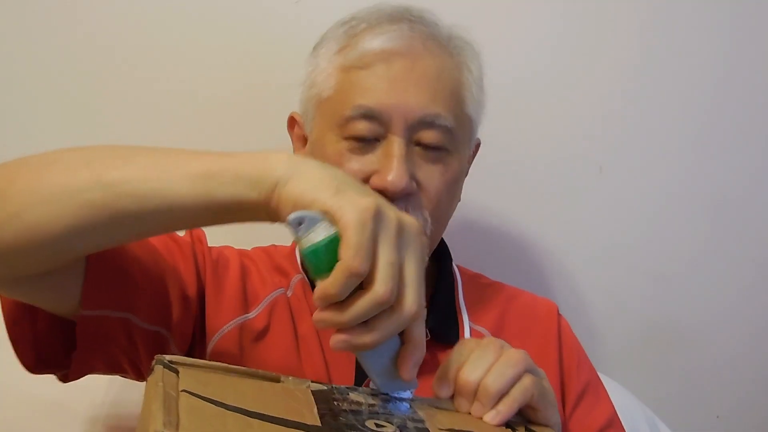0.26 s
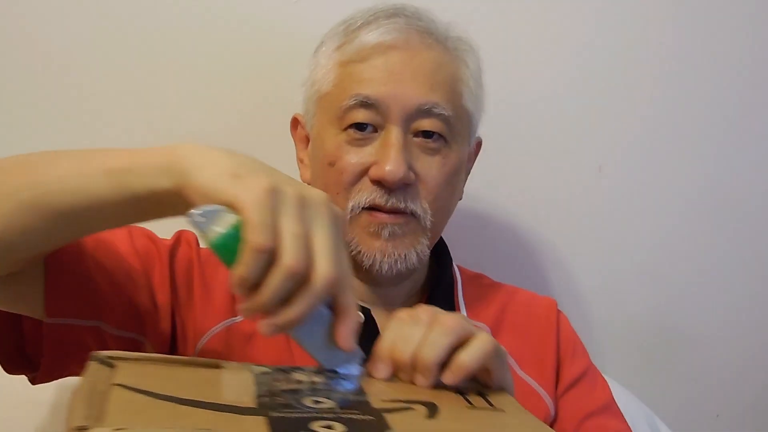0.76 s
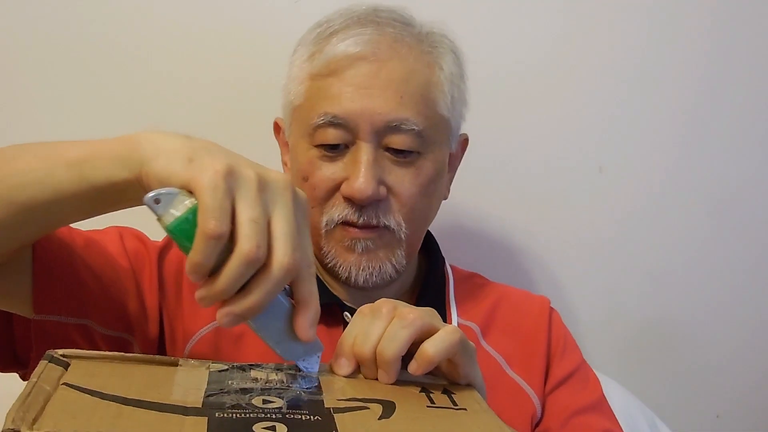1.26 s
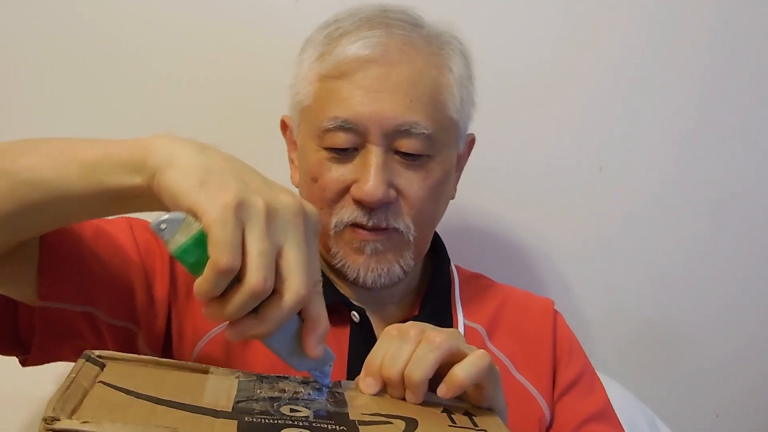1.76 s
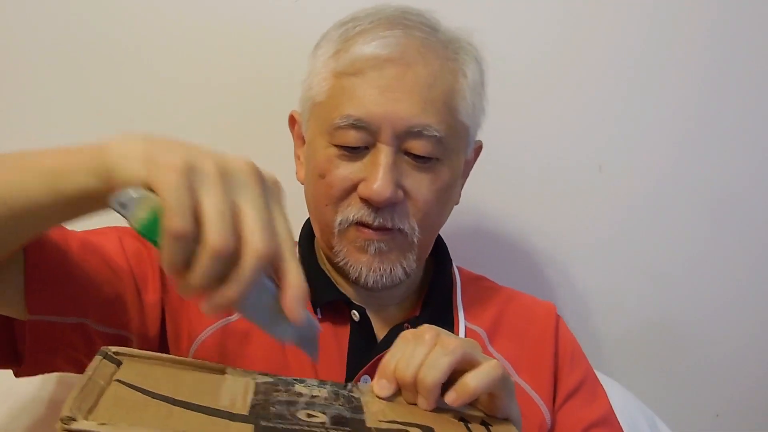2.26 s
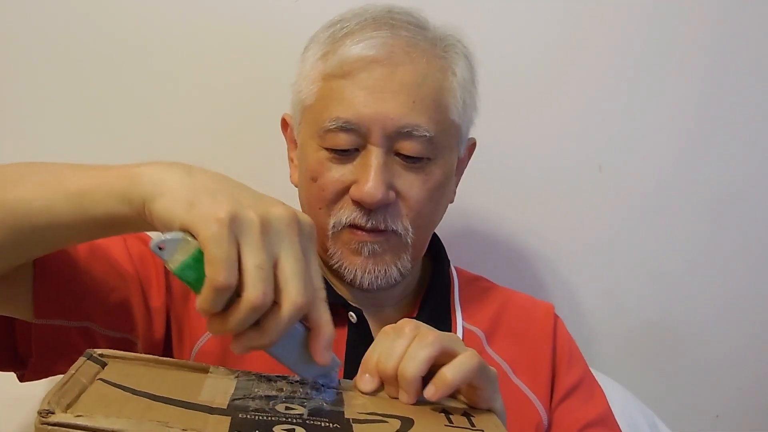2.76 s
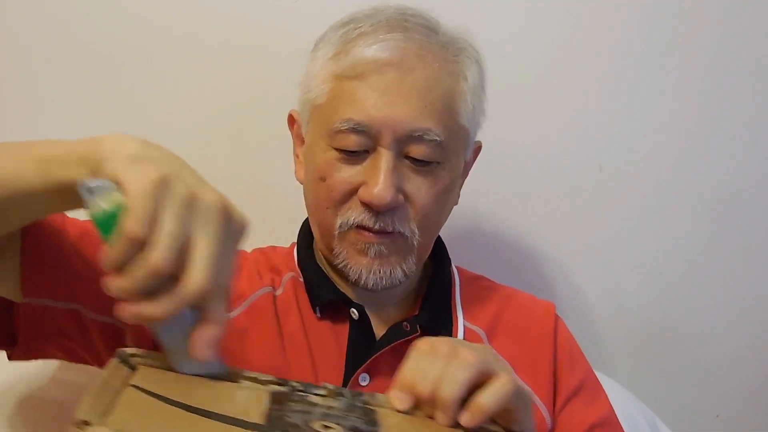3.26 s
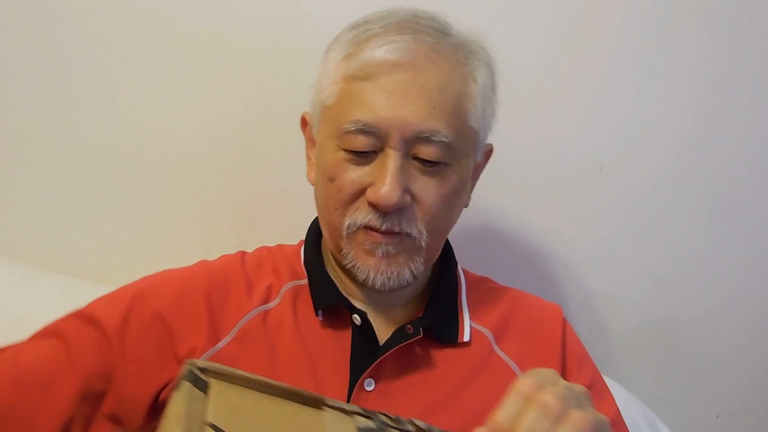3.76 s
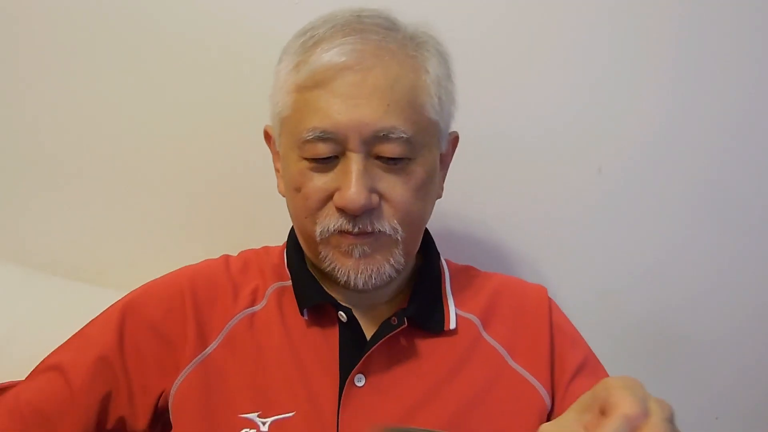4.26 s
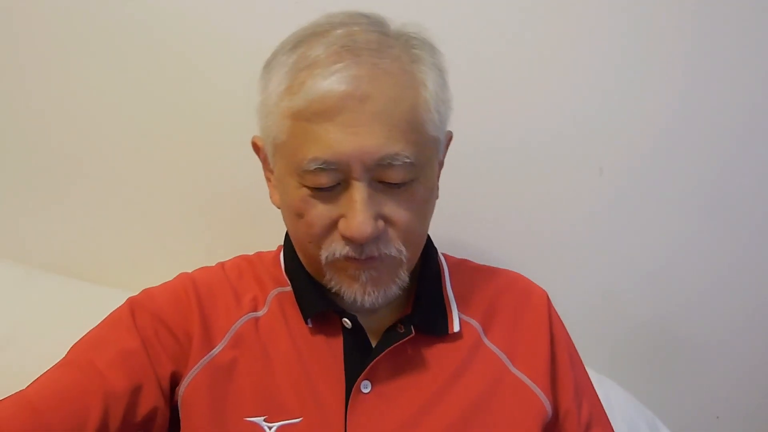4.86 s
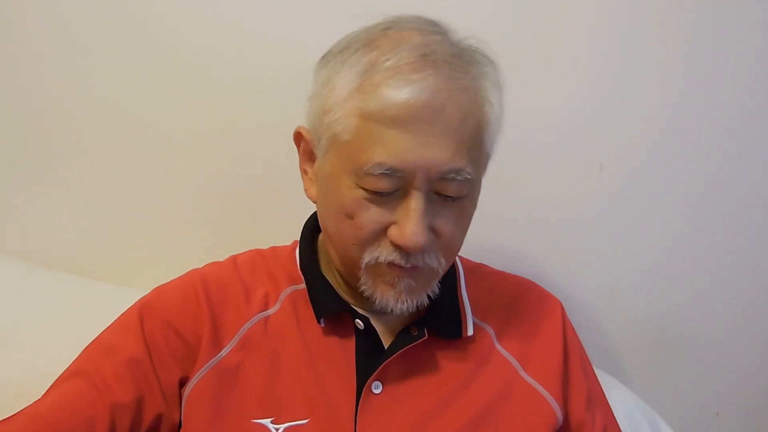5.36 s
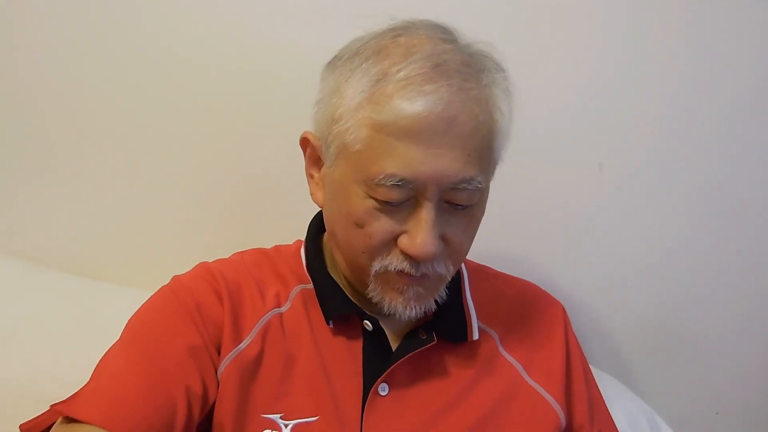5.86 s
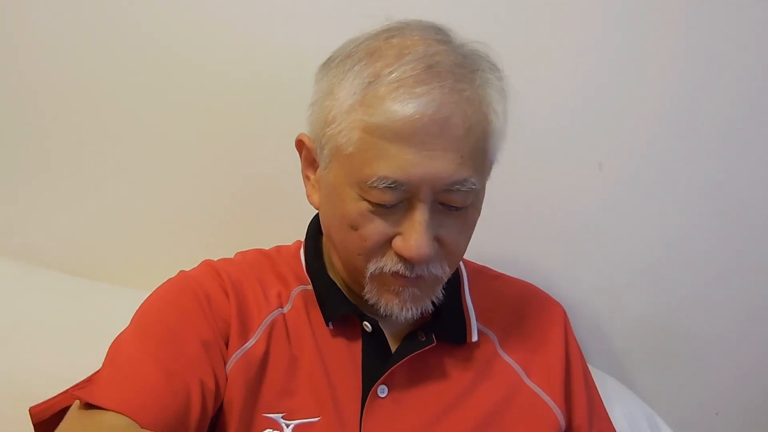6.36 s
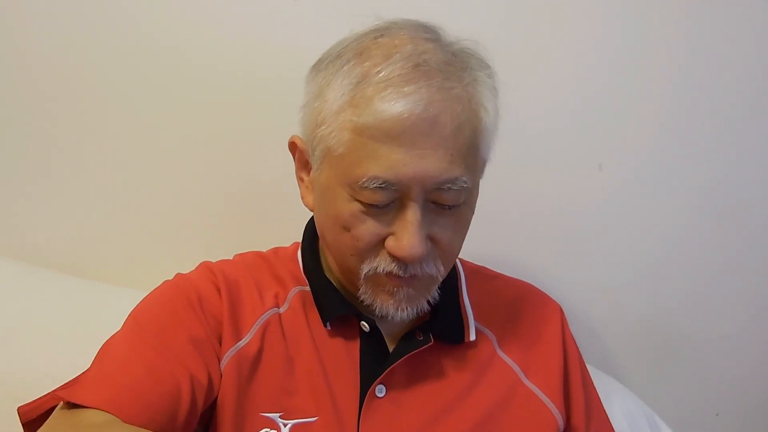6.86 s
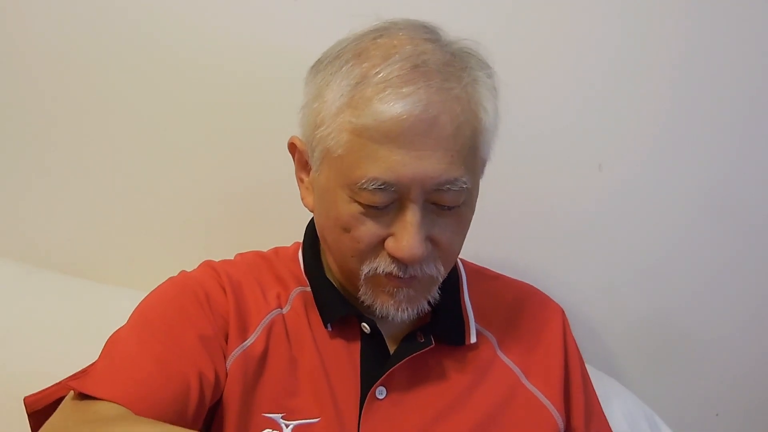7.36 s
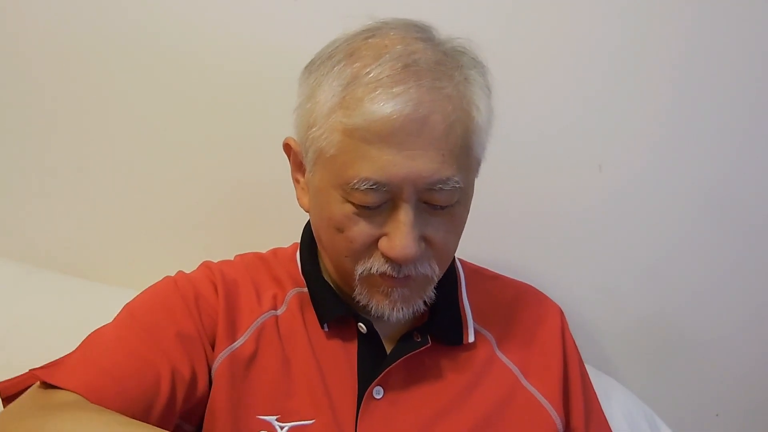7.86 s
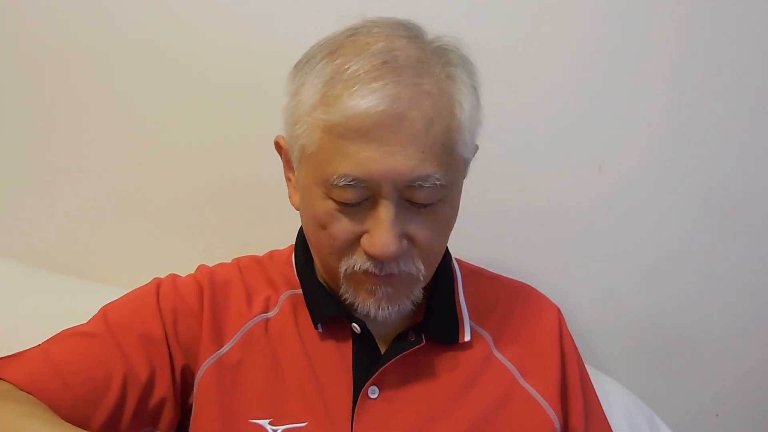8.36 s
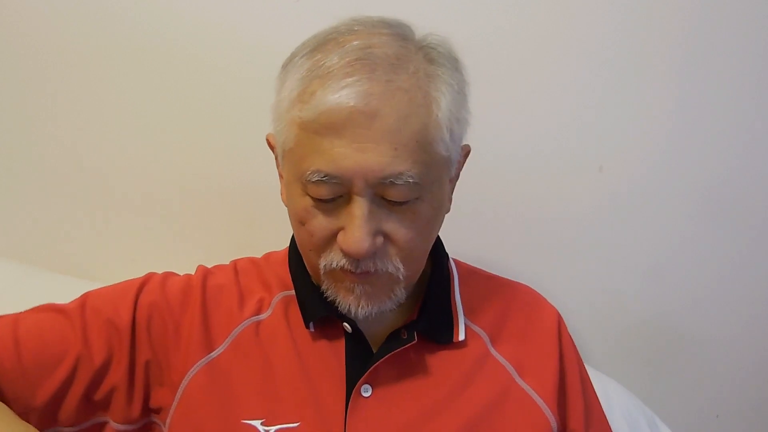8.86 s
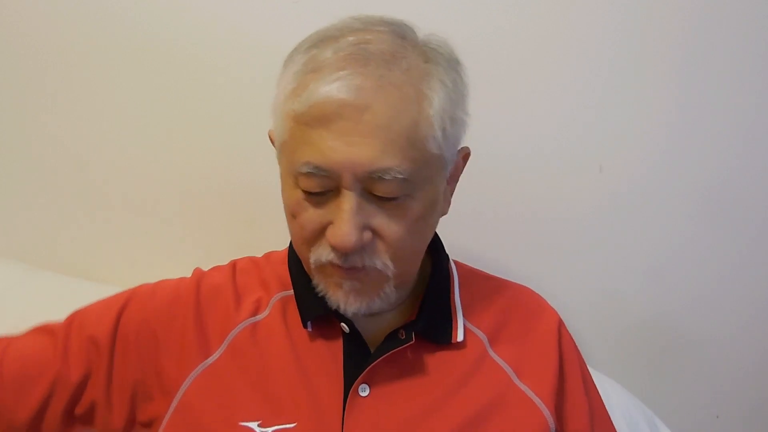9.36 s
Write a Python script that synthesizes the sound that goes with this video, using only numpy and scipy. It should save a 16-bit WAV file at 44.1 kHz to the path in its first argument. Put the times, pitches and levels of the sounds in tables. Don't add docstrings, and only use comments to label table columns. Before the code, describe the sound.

A box cutter works very near the microphone, indoors, with little echo. Thin ticks and gritty rubbing are broken by sudden bright tape cracks and short cardboard tears. Midway the cutting pauses for a soft cloth-like slide and small creaks. Isolated snaps resume, building into a vigorous ragged rip with popping flutes and boxy thumps, then faint rustles over low hiss.

```python
import sys
import numpy as np
from scipy import signal
from scipy.fft import rfft, irfft, next_fast_len
from scipy.io import wavfile
from scipy.ndimage import uniform_filter1d, minimum_filter1d, map_coordinates

SR = 44100
rng = np.random.default_rng(int(sys.argv[2]) if len(sys.argv) > 2 else 0)


def invert_db(x):
    u = np.asarray(x, float) / 20
    return 10 ** u


def dump_mix(stems):
    frames = np.atleast_2d(stems).T
    limited = np.clip(frames, -1, 1)
    pcm = np.round(limited * 32767).astype(np.int16)
    wavfile.write(sys.argv[1], SR, pcm)


N = 423360

# start in seconds, peak in dB, low mode in dB.
GUARD = [
    (1.1424, -19, -20),
    (2.5228, -27, -17),
    (2.6, -32.5, -15),
    (2.6424, -36, -7),
    (2.6535, -26, -7.5),
    (2.6375, -40, 2),
    (3.6688, -31, -12),
    (3.997, -35, -8),
    (6.029, -32, -13.5),
]
# frequency in Hz, t60 in seconds.
PLASTIC = [(2100, .026), (3480, .011)]
# frequency in Hz, width in Hz, level in dB.
BOX = [(270, 103, 0.5), (843, 570, 2)]
# frequency in Hz, width in Hz, level in dB.
EDGE = [(1200, 1920, -0.5), (2800, 4180, 1.5)]
# frequency in Hz, width in Hz, level in dB.
TAPE = [(3530, 1680, 7), (6230, 3700, 5.5)]
# frequency in Hz, width in Hz, level in dB.
FIZZ = [(6610, 5660, -5.5), (11070, 2800, 4), (13120, 3640, -4)]
# frequency in Hz, width in Hz, level in dB.
THUMP = [(42, 42, -13), (190.6, 135, 0)]
# frequency in Hz, density in dB per Hz.
HUSH = [(140, -6), (280, 4), (850, 5), (1220, 7.5), (1550, 3), (4000, 1.5), (10000, -7), (16000, -10.5)]
# frequency in Hz, correlation from -1 to 1.
ALIKE = [(60, .965), (250, .996), (700, .965), (1400, .88), (3100, .62), (8000, .25), (15000, -.15)]
# frequency in Hz, t60 in seconds.
ROOM = [(200, 0.09), (2000, 0.15), (12000, 0.18)]
# start in seconds, peak in dB, frequency in Hz.
KNOCKS = [
    (3.238, -27.5, 270),
    (3.242, -36, 226),
    (7.99, -35, 284),
    (8.0705, -16.5, 814),
    (8.19, -26, 279.5),
    (8.46, -32, 270),
]
# peak in seconds, strength in dB, answer of the card below in dB, halving time in ms.
TAPE_SNAPS = [(.208, -39.5, 2, 1.8), (.3426, -29, -14, 1.1), (.38, -49, 1.5, 2.1), (.9593, -59, 11.5, 2.1),
              (1.1385, -39, -0.5, 2.5), (1.1425, -25.5, -6, 2.4), (1.151, -50, -13, 2.7),
              (1.304, -39, -3, 0.88), (2.0962, -49.5, 11, 1.13), (2.1661, -38.5, -25, 3.5),
              (2.5243, -29, -26, 4.3), (2.531, -24, -8.5, 1.35), (2.6024, -55.5, 4, 3),
              (2.6526, -32, -3.5, 2.7), (3.3723, -23, -24, 1.5), (3.379, -20.5, -8.5, 1.4),
              (3.6699, -42, -7, 10), (3.8393, -49, 0, 2), (4.904, -33, -22, 2.3), (5.4668, -23, -21, 2.4),
              (5.475, -32, -23, 6.9), (6.0302, -39, -7, 1.9), (6.06, -29.5, -22, 2.6),
              (6.4465, -34, -0.5, 0.97), (6.4544, -30, 3, 1.6), (6.7586, -46, -3.5, 6.6),
              (6.7753, -32.5, -5, 4.5), (6.9638, -28.5, -7.5, 4.2), (6.9674, -18, -31, 1.4),
              (7.4476, -37.5, 3, 5.3), (8.404, -35.5, -0.5, 7.5), (8.839, -28.5, 0.5, 7.9)]
# peak in seconds, strength in dB, answer of the card in dB, halving time in ms.
FIBRES = [(.0353, -47, 17.5, 1.8), (.4116, -39.5, -3, 2.8), (.6404, -44, -12, 1.7),
          (.7607, -31.5, -5, 0.93), (1.373, -42, -24, 1.2), (2.2684, -26, -10, 0.76),
          (3.0845, -28.5, -9, 1.3), (3.126, -38, -20, 1), (3.1715, -28, 2, 9.4), (3.6316, -36, -22, 0.83),
          (4.0268, -43.5, -15, 23), (4.168, -37.5, -1, 9.5), (6.3033, -43, -13, 3.5),
          (6.3163, -30, -12, 1.1), (6.7912, -20.5, -2.5, 2.15), (7.6295, -32.5, 0.5, 3),
          (7.7, -24.5, 12, 4.9), (7.782, -22, -15, 1.4), (7.862, -55, -20, 1), (7.937, -30.5, 6.5, 16),
          (7.9913, -24.5, 6.5, 6.1), (8.0715, -22.5, 5.5, 10.8), (8.154, -15, 3.5, 1.6),
          (8.4239, -20.5, -7, 3.4), (8.4477, -18, -14, 1.6), (8.7018, -20, -18, .8), (8.706, -21, -28, 5.6),
          (8.778, -18.5, -24, .55), (8.804, -28.5, 5.5, 56), (8.8522, -17, 7, 9.1), (8.9252, -37, -10, 1.4),
          (8.9668, -45, -20, 1), (9.06, -26, 11.5, 9.2), (9.09, -20.5, 10.5, 4.3)]
# peak in seconds, strength in dB, depth of the cut in dB, halving time in ms.
JERKS = [(.1273, -51.5, 12, 2.4), (.217, -23.5, -12.5, 3.4), (.2255, -33, 0, 1.7), (.651, -49, 1, 5),
         (1.9175, -27, 1.5, 7.7), (1.9338, -14, -10, 2.6), (1.9405, -19, 0.5, 7.4), (1.9533, -21.5, 4.5, 6),
         (1.9655, -20, 5, 1.6), (1.974, -41, 15.5, 14), (1.9831, -23.5, 0.5, 3), (2.6425, -37.5, 6, 1.5),
         (3.0, -17.5, -1, 11.3), (3.1911, -19, -4, 11.4), (3.2321, -21.5, -1, 7.3),
         (3.3959, -21, -8.5, 5.3), (4.0046, -43, 5, 3.7), (4.0443, -49.5, 4.5, 4.7),
         (4.0854, -44.5, -3, 4.9), (4.2174, -41.5, -23, 31), (6.4835, -27.5, -5.5, 3.2),
         (6.4942, -34.5, -3.5, 16), (6.5153, -31, 2, 7), (7.2353, -42, 2.5, 3.5), (7.261, -36.5, 1, 1.66),
         (7.4052, -32.5, -3.5, 17), (7.4212, -19.5, -4, 3.4), (7.4303, -34, 2, 11.5),
         (7.5952, -32.5, -5, 0.93), (8.787, -40, -24, 6.1)]
# peak in seconds, strength in dB, depth in dB, halving time in ms.
RIP = [(7.6785, -38, 1, 14), (7.6933, -26.5, 12, 1.3), (7.7145, -29.5, 2.5, 10), (7.7352, -38.5, 3, 8.1),
       (7.7535, -22.5, 1.5, 7), (7.826, -36, -2, 2.7), (7.901, -36, 0.5, 8.3), (7.914, -36, 0.5, 10.5),
       (7.927, -24, -3, 5.1), (7.9545, -22.5, -1.5, 12), (7.9728, -20, -0.5, 3.7), (8.0315, -21, -0.5, 7.7),
       (8.136, -26, -2.5, 41), (8.1905, -15.5, -2, 6.3), (8.238, -33, -10, 7.4), (8.4154, -32, -2, 2.8),
       (8.4313, -32.5, -3.5, 66), (8.4578, -22, 3.5, 7.6), (8.5167, -32.5, 5.5, 9.4), (8.5572, -35.5, 6, 9),
       (8.5755, -32, -2, 5.7), (8.598, -30, -3, 2.2), (8.6105, -29.5, -4, 8.5), (8.6786, -27, -3.5, 5),
       (8.697, -17, -21, 2.2), (8.7247, -23.5, -8, 3.5), (8.735, -31.5, -8.5, 12), (9.0098, -16, 4, 3.26),
       (9.017, -21.5, 1.5, 22), (9.0747, -26, -4.5, 24)]
# peak in seconds, strength in dB, boom in dB, halving time in ms.
BUMPS = [(.7685, -40.5, -2.5, 2.7), (.8421, -66, 2, 3.3), (.9038, -36.5, -5, 2.2), (1.1209, -54, 14.5, 1.9),
         (1.4316, -40, -2, 4.2), (1.4791, -36, 2.5, 1.43), (1.85, -57.5, 13, 4), (4.349, -32, -8, 5.2),
         (4.5147, -36, -23, 1.3), (4.5811, -38.5, -5, 3.8), (4.6996, -39, -3.5, 3.6), (4.7458, -53, 9, 12),
         (4.7935, -43.5, -6, 14), (4.818, -39.5, -6, 14), (4.857, -43, -4, 6.7), (5.013, -47.5, 4.5, 3.7),
         (5.049, -43.5, 0, 12), (5.125, -48.5, 5, 7.1), (5.709, -48, -7, 5.4), (7.275, -46, 4, 3.3),
         (8.0123, -30, -23, 9.4), (8.629, -42, 4, 7.5), (8.998, -29.5, -5, 5.3), (9.247, -45, 0, 4.7),
         (9.4428, -42.5, -38, 4.3), (9.4901, -39, -6, 5)]
# events, dB over strength for box, edge, tape and fizz,
# share of the events' third column for the same four.
KINDS = [
    (TAPE_SNAPS, (-5, 2, 1, -0.5), (1.87, 1.63, 0.29, 0.5)),
    (FIBRES, (-13, -4, -15, 0), (0.82, 0.64, 0, 0)),
    (JERKS, (-5.5, 0.5, -1.5, 2), (1, 0.95, 0.036, 0.13)),
    (RIP, (-5, 1, -5, 0.5), (0.62, 1, 0.21, 0.15)),
    (BUMPS, (-1.5, -2.5, -37, -8.5), (1, 0, 0, 0)),
]
# time of most pressure in seconds, level in dB, brightness
# in dB, doubling time in seconds, halving time in seconds.
STROKES = [(.1, -62.5, -12, 0.66, 0.45), (.36, -49, -3, 0.17, 0.071), (.54, -53, 3.5, 0.029, 0.019),
           (.72, -58.5, -2, 0.081, .11), (1.06, -51, -1.5, 0.23, 0.17), (1.4, -71, -7, 0.21, 0.3),
           (1.63, -50, -0.5, 0.038, 0.037), (1.88, -65, 2, 0.1, .2), (1.913, -37, 2, 0.0046, .02),
           (2.06, -48, -12, 0.11, 0.045), (2.65, -62.5, -12, 0.5, 0.13),
           (2.805, -54.5, 2, 0.035, 0.026), (3.05, -31.5, -3.5, 0.0046, 0.018),
           (3.13, -60, 8, 0.031, .11), (3.3, -37, -8, 0.054, 0.024), (3.39, -42.5, 0.5, 0.095, 0.032),
           (3.72, -55.5, -2.5, 0.31, 0.24),
           (5.04, -45, -1.5, 0.069, 0.021), (5.56, -61.5, 1, .03, 0.13), (6.3, -60.5, 2, 0.069, .11),
                (6.44, -51, 0.5, 0.023, 0.091), (6.738, -49.5, -6, 0.02, 0.047),
                (7.39, -48.5, -19, 0.011, 0.039), (7.87, -53, -1, 0.31, 0.58), (8.33, -64, 3, 0.66, 0.29),
                (8.64, -41.5, -3, 0.18, 0.049), (8.79, -48, -10, 0.13, 0.033), (9.2, -61, -6, 0.012, 0.21),
                (9.4, -52.5, -2, 0.21, 0.052)]
# time in seconds, pressure in dB, brightness in dB.
SLIDE = [
    (3.96, -64, -7),
    (4.1, -47, -3.5),
    (4.18, -43, 3),
    (4.32, -46, 1.5),
    (4.47, -50, -3),
    (4.85, -52, -4),
    (5.35, -50, 0.5),
    (5.45, -47, -3),
    (5.56, -59, -4),
]
# start in seconds, peak in dB, frequency in Hz.
POPS = [(0.2048, -28, 2580), (0.2163, -25.5, 2050), (0.4403, -40, 650), (0.7671, -40, 2360),
        (0.9447, -43, 1340), (1.909, -34, 3190), (1.9637, -7.5, 2780), (1.9655, -17, 1120),
        (2.997, -16, 2640), (3.2333, -24, 2680), (3.2429, -24, 2550), (3.3711, -30, 3170),
        (3.379, -21.5, 2620), (3.3967, -17.5, 2010), (3.7246, -39.5, 2980), (3.9933, -38, 955),
        (3.9952, -40, 3220), (6.4925, -37, 3070), (6.518, -29, 2670), (6.7973, -29.5, 920),
        (6.962, -30, 2660), (7.398, -36, 2800), (7.5945, -38.5, 2550), (7.7073, -20, 795),
        (7.7557, -12.5, 1990), (7.9284, -21.5, 2550), (8.035, -21, 2050), (8.0739, -14, 790),
        (8.1531, -18, 1960), (8.2002, -12, 1050), (8.3693, -43, 1574), (8.4162, -28, 1730),
        (8.447, -26, 2840), (8.4574, -15, 1290), (8.4656, -33, 860), (8.5598, -23, 560), (8.809, -22, 2870),
        (8.8515, -12, 1620), (8.8624, -20, 770), (8.882, -24, 2400), (9.0086, -11.5, 2550),
        (9.018, -10, 2800), (9.0712, -22, 2020)]
# start in seconds, peak in dB, frequency in Hz.
PINGS = [(0.1854, -40, 3250), (0.2164, -15, 10640), (0.217, -16.5, 9100), (0.2166, -16, 5670),
         (0.4263, -36, 11700), (0.7606, -45, 8570), (0.8414, -41, 11970), (1.1417, -25, 6840),
         (1.9394, -20, 8830), (2.5308, -29, 4740), (3.001, -18, 7400), (3.003, -13, 5600),
         (3.231, -18, 9700), (3.371, -24, 3490), (3.3946, -19, 4980), (3.4031, -14, 8900),
         (3.666, -35, 12530), (3.8401, -37, 3500), (5.4674, -21, 6340), (6.4831, -22, 6400),
         (6.514, -19.5, 5620), (6.7569, -33, 5170), (6.784, -35, 8400), (6.7906, -25, 3750),
         (6.7909, -29, 7640), (6.9615, -40, 4010), (6.9615, -28, 7800), (6.967, -29, 8050),
         (7.4192, -13.5, 6700), (7.4193, -15, 4500), (7.4289, -20, 4230), (7.7818, -26, 6900),
         (7.8954, -41, 6070), (7.9285, -17, 7620), (7.9642, -15, 7540), (7.9667, -22, 9350),
         (8.034, -19, 7500), (8.1484, -15, 11800), (8.1536, -17, 4800), (8.6965, -19, 8600),
         (8.6977, -15, 5600), (8.7334, -25, 5730), (8.8617, -25, 8350), (9.0093, -13, 6330),
         (9.4169, -45, 12660)]
# start in seconds, peak in dB, frequency in Hz, t60 in ms.
CREAKS = [(3.005, -18.5, 496, 29), (3.008, -23, 860, 29), (4.346, -33, 1820, 24), (4.347, -36, 895, 16),
          (4.513, -32.5, 1670, 8.7), (4.581, -38, 1290, 12), (4.696, -42, 860, 13), (4.746, -36, 1520, 11),
          (4.792, -36, 1230, 13), (4.814, -34, 1760, 12), (4.856, -36, 1190, 14), (5.046, -44, 860, 14),
          (5.4755, -36, 6100, 12), (8.7047, -17.5, 5600, 8.3), (8.7245, -24, 6140, 10),
          (8.742, -33, 6000, 40), (9.023, -21, 2800, 20), (7.749, -18.5, 2480, 8.7), (1.934, -13, 740, 12),
          (2.532, -43, 2120, 22), (0.65, -40, 785, 7.7), (1.557, -42, 1200, 10), (9.057, -14.5, 1120, 13)]
# peak in seconds, level in dB.
TICKS = [(0.0517, -38), (0.6391, -33), (1.0181, -35), (1.3664, -40), (1.6172, -29.5), (1.7933, -44),
         (1.8061, -39), (1.8632, -47), (2.1914, -45), (2.679, -42), (2.7064, -35), (2.7274, -46),
         (2.908, -45), (2.9454, -47), (3.6101, -36), (3.8127, -40), (3.8888, -37), (3.9722, -45),
         (4.0404, -35), (5.67, -40), (5.7309, -47), (5.881, -41), (6.6423, -34), (7.1253, -45),
         (7.5832, -41), (7.9547, -12), (8.1335, -14), (9.3736, -41), (9.398, -34), (9.5974, -31)]
# peak in seconds, level in dB.
NICKS = [(0.3306, -35), (1.2685, -52), (1.5399, -44), (1.5551, -34), (1.722, -42), (2.1084, -34),
         (2.3306, -46), (2.394, -45), (2.8237, -33), (3.5259, -44), (3.5411, -36.5), (5.7546, -46),
         (6.3914, -41), (7.1787, -47), (7.7286, -16), (8.557, -22)]
# events, levels for box, edge, tape and fizz in dB.
FAINT = [(TICKS, (-28, -21, -11, -4.5)), (NICKS, (-16, -4, -8, -14))]
SWELL_S = (0.0018, 0.0023, 0.0017, 0.0018)


def unit(x):
    return x / np.sqrt(np.mean(x ** 2) + 1e-20)


def along(points, hz):
    f, v = np.transpose(points)
    return np.interp(np.log(hz + 1), np.log(f + 1), v)


def filtered(x, response):
    m = next_fast_len(x.shape[-1] + 8192)
    spectrum = rfft(x, m) * response(np.fft.rfftfreq(m, 1 / SR))
    return irfft(spectrum, m)[..., :x.shape[-1]]


def ringing(table, f):
    once = 0
    for k, (centre, width, db) in enumerate(table):
        damping = 1j * f * width
        once = once + (-1) ** k * invert_db(db / 2) * damping / (centre * centre - f * f + damping)
    return once ** 2 / np.sqrt(np.mean(np.abs(once) ** 4))


def stereo(pair, alike=ALIKE):
    def mid_side(hz):
        angle = np.arccos(np.clip(along(alike, hz), -1, 1)) / 2
        return np.array([np.cos(angle), np.sin(angle)])

    mid, side = filtered(pair, mid_side)
    return np.array([mid + side, mid - side])


def grit(rate, spread_db, life):
    size = invert_db(spread_db * np.minimum(rng.exponential(size=N), 3))
    sparks = (rng.random(N) < rate / SR) * size
    return unit(signal.lfilter([1], [1, -np.exp(-1 / (life * SR))], sparks))


def hush():
    air = unit(filtered(rng.standard_normal((2, N)), lambda hz: invert_db(along(HUSH, hz))))
    hum = filtered(rng.standard_normal((2, N)), lambda hz: ringing([(59, 30, 0)], hz))
    floor = invert_db(-57.5) * air + invert_db(-79) * hum
    return stereo(floor, [(40, 0.58), (300, 0.82), (900, 0.2), (15000, 0.034)])


def snaps():
    lead = SR // 40
    power = np.zeros((4, N + SR))
    t = (np.arange(SR // 5) - lead) / SR
    crack = invert_db(-6 * np.abs(t) / 0.000085) * np.array([[0], [.4], [1], [.6]])
    tick_ms = 1.14
    faint = [([(s, db, 0, tick_ms) for s, db in rows], colour_db, 0) for rows, colour_db in FAINT]
    for table, colour_db, share in KINDS + faint:
        for s, db, depth_db, half_ms in table:
            half = max(half_ms - .6, .3) / 1000
            rise = np.minimum(.5 * half, SWELL_S)[:, None]
            swell = invert_db(-6 * np.where(t < 0, -t / rise, t / half))
            shape = np.hypot(swell, crack)
            bodies = invert_db(db + np.array(colour_db) + depth_db * np.array(share))
            power[:, round(s * SR) - lead:][:, :len(t)] += (bodies[:, None] * shape) ** 2
    own = np.array([grit(rate=280, spread_db=-2.5, life=0.0006) for body in power])
    shared = grit(rate=700, spread_db=1.0, life=0.001)
    return np.sqrt(power[:, :N]) * unit(0.48 + 0.41 * shared + 0.2 * own)


def cardboard(force):
    pushes = [*force, invert_db(-14.5) * force[0]]
    out = np.zeros((2, N))
    for push, body in zip(pushes, (BOX, EDGE, TAPE, FIZZ, THUMP)):
        out += filtered(push * rng.standard_normal((2, N)), lambda f: ringing(body, f))
    return stereo(out)


def room(x):
    out, step = np.zeros((2, N + SR)), SR // 5
    late = np.pad(x.mean(0), (180, 0))[None]
    for at in range(0, N, step):
        hz, t, z = signal.stft(rng.standard_normal((2, SR // 4)), SR, nperseg=256)
        decay = invert_db(-60 * t / along(ROOM, hz)[:, None])
        tail = stereo(signal.istft(z * decay, SR, nperseg=256)[1])
        answer = signal.fftconvolve(late[:, at:at + step], tail / np.linalg.norm(tail[0]), axes=1)
        out[:, at:at + answer.shape[1]] += answer
    return out[:, :N]


def rubbed(db, bright_db):
    boom_db = db - 11 + 0.17 * (db + 51.5)
    return invert_db(np.array([boom_db, db - 2.5, db - 6.5, db + bright_db])) ** 2


def drag():
    t = np.arange(0, N + 64, 64) / SR
    s, db, bright_db = np.transpose(SLIDE)
    power = rubbed(np.interp(t, s, db, -120, -120), np.interp(t, s, bright_db))
    for s, db, bright_db, rise, fall in STROKES:
        pressure = invert_db(-12 * np.where(t < s, (s - t) / rise, (t - s) / fall))
        power += rubbed(db, bright_db)[:, None] * pressure
    force = np.array([np.interp(np.arange(N) / SR, t, np.sqrt(p)) for p in power])
    catch = map_coordinates(rng.standard_normal((4, 200)), np.mgrid[:4, :N] * [[[1]], [[15 / SR]]])
    return force * invert_db(0.4 * catch) * unit(0.71 + 0.19 * grit(rate=210, spread_db=2.5, life=0.00044))


def pops():
    out, t = np.zeros(N + SR), np.arange(SR // 16) / SR
    flutes = [(*row, 12) for row in POPS]
    strands = [(*row, 8.1) for row in PINGS]
    soft_start = 1 - np.exp(-t / 0.00036)
    for s, db, hz, t60_ms in flutes + strands + CREAKS:
        fade = invert_db(db + 4 - 60000 * t / t60_ms) * soft_start
        out[round(s * SR):][:len(t)] += fade * np.sin(2 * np.pi * hz * t)
    return out[:N]


def guard():
    out, t = np.zeros(N + SR), np.arange(SR // 10) / SR
    soft_start = 1 - np.exp(-t / 0.00084)
    low, high = (invert_db(-60 * t / t60) * np.sin(2 * np.pi * hz * t) * soft_start for hz, t60 in PLASTIC)
    for s, db, low_db in GUARD:
        out[round(s * SR):][:len(t)] += invert_db(db + 3.0) * (invert_db(low_db) * low + high)
    return out[:N]


def knocks():
    out, t = np.zeros(N + SR), np.arange(SR // 5) / SR
    for s, db, hz in KNOCKS:
        ring = np.sin(2 * np.pi * hz * t) * (1 - np.exp(-t / 0.0057))
        out[round(s * SR):][:len(t)] += invert_db(db + 12.0 - 60 * t * hz ** .5 / 1.03) * ring
    return out[:N]


def scene():
    box = cardboard(np.hypot(snaps(), drag())) + guard() + knocks() + pops()
    return box * invert_db(np.array([[-.6], [.6]])) + invert_db(-5.5) * room(box) + hush()


def ducked(x):
    corner_hz, ahead_s, jump_db = 1800, .015, 19.5
    treble = filtered(x, lambda hz: 1 / (1 + (corner_hz / (hz + 1)) ** 4))
    power = np.abs(uniform_filter1d(np.mean(treble ** 2, 0), size=88)) + 1e-14
    span = round(ahead_s * SR)
    ahead = -minimum_filter1d(-power, size=span, origin=-(span // 2))
    keep = 1 / (1 + (ahead / power / invert_db(2 * jump_db)) ** 2)
    return x - treble * (1 - uniform_filter1d(keep, size=44))


def top_cut(x):
    return signal.sosfilt(signal.butter(12, 16960, fs=SR, output="sos"), x)


def record(dry):
    rounded = dry / (1 + np.abs(dry / .7) ** 4) ** (1 / 4)
    limited = filtered(ducked(rounded), lambda hz: 1 / (1 + (hz / 15900) ** 160))
    return top_cut(limited)


dry = scene()
out = record(dry)
dump_mix(out)
```